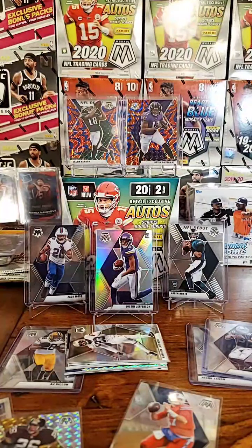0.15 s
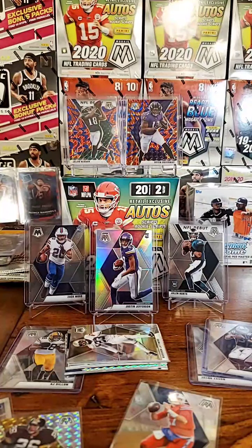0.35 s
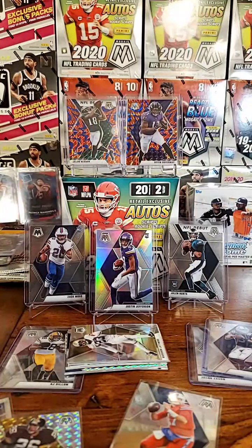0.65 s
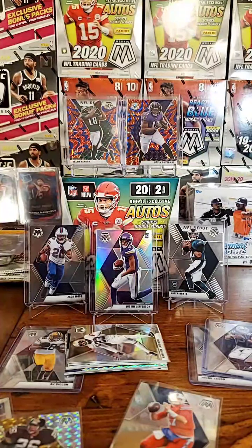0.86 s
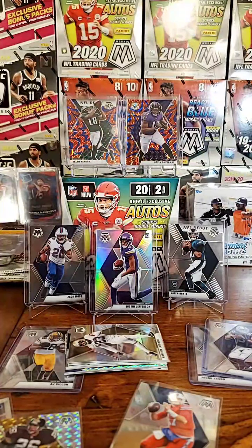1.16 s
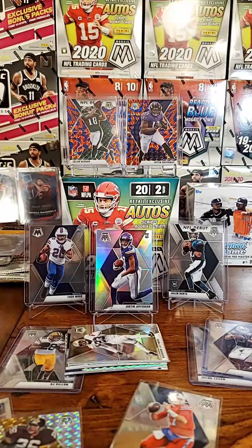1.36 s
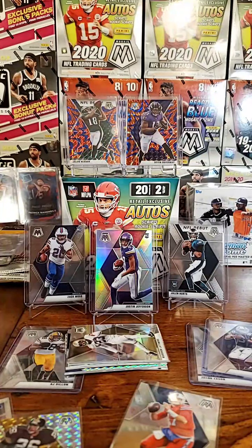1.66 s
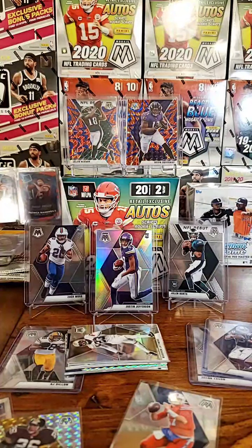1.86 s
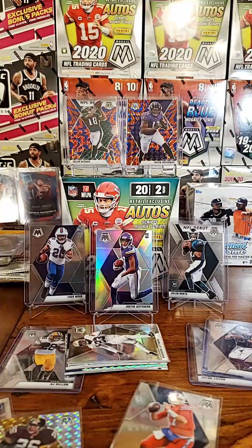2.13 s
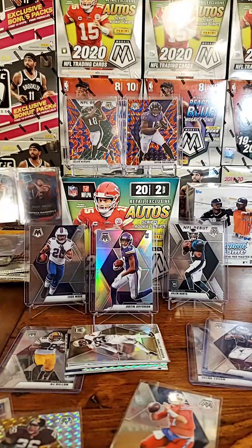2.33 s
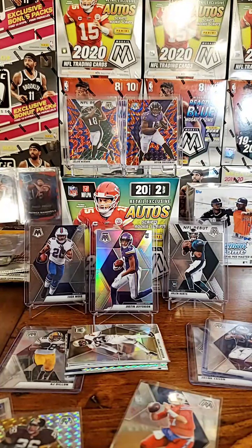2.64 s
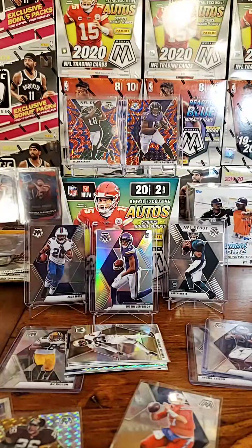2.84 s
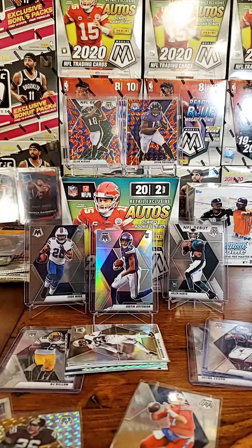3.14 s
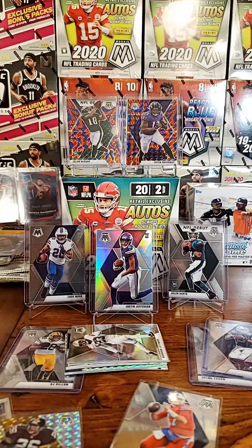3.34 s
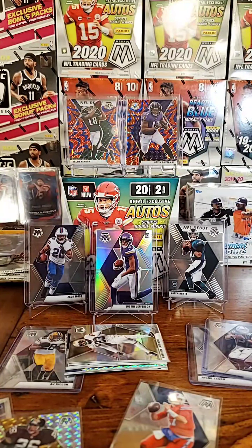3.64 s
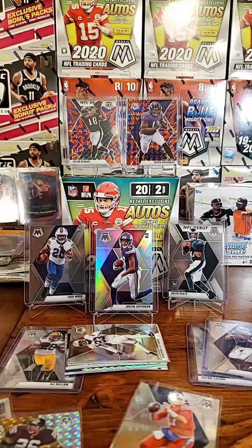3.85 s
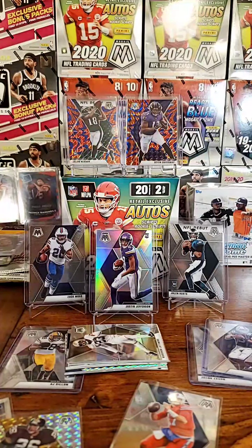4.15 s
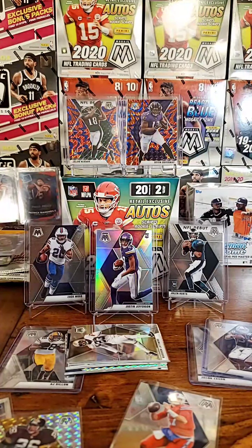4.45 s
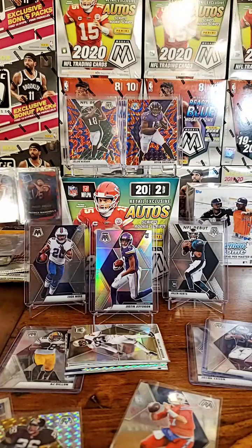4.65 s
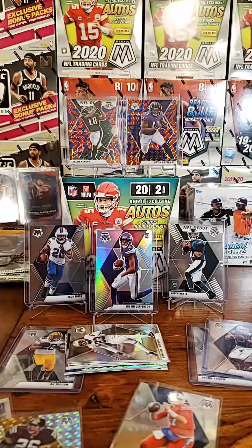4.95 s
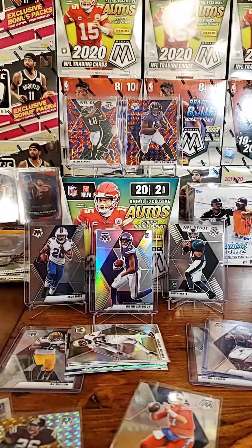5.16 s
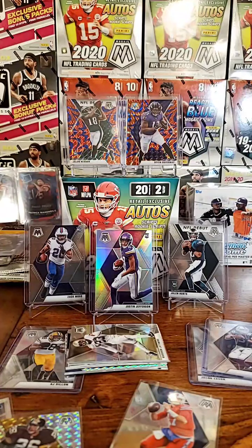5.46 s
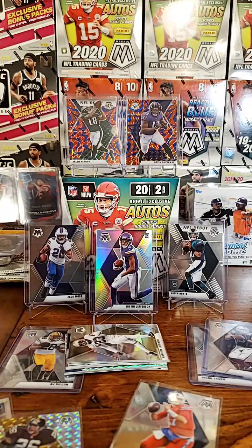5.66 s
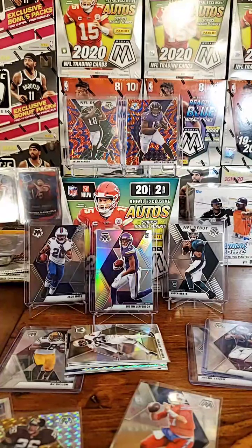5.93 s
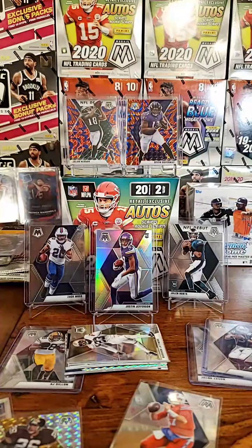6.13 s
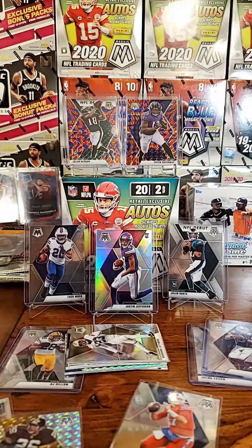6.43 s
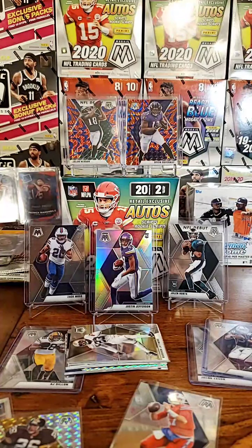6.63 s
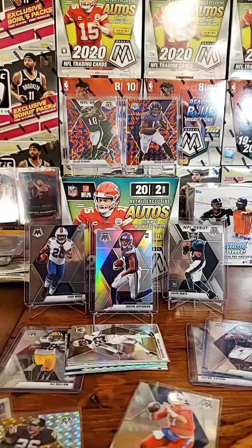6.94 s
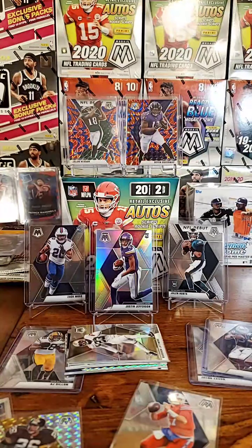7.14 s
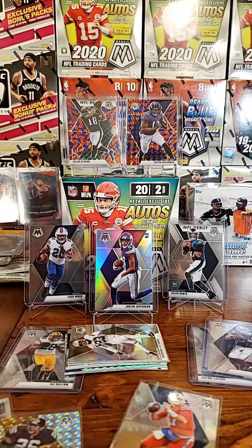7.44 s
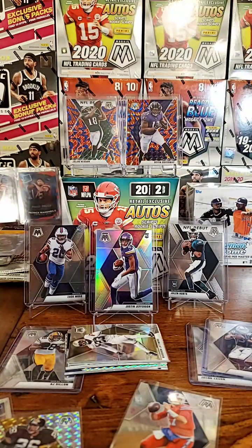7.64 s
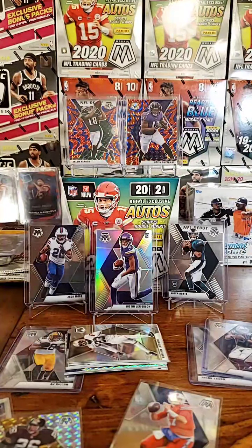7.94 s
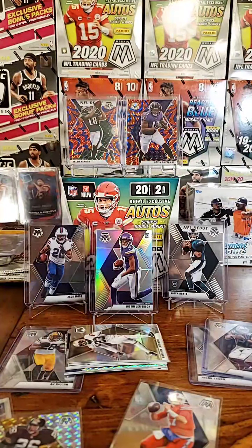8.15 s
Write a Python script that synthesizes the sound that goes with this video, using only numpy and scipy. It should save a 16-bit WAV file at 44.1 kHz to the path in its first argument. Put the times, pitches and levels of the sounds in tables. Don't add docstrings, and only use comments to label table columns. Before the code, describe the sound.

Close up, stiff plastic snaps and thin film crinkles over a low appliance hum, then a hard holder clacks onto a wooden table.

```python
import sys
import numpy as np
from scipy import signal
from scipy.fft import rfft, irfft, next_fast_len
from scipy.io import wavfile
from scipy.ndimage import uniform_filter1d

SR = 44100
rng = np.random.default_rng(int(sys.argv[2]) if len(sys.argv) > 2 else 0)


def ratio_of_db(decibels):
    return 10 ** (np.asarray(decibels, float) / 20)


def master_out(mix):
    frames = np.transpose(np.atleast_2d(mix))
    ceiling = np.clip(frames, -1, 1)
    pcm = np.round(ceiling * 32767).astype(np.int16)
    wavfile.write(sys.argv[1], SR, pcm)


N = 365677


def read(points, hz):
    f, value = np.transpose(points)
    return np.interp(np.log(hz + 1), np.log(f + 1), value)


def evened(x):
    return x / np.sqrt(np.mean(x ** 2) + 1e-20)


def add(mix, s, sound):
    part = mix[round(s * SR):][:len(sound)]
    part += sound[:len(part)]


def band(x, lo_hz, hi_hz, order=3):
    return signal.sosfilt(signal.butter(order, [lo_hz, hi_hz], "bandpass", fs=SR, output="sos"), x)


def shaped(x, gain):
    size = next_fast_len(N)
    return irfft(rfft(x, size) * gain(np.fft.rfftfreq(size, 1 / SR)), size)[..., :N]


def drift(seconds):
    step = max(int(seconds * SR / 8), 1)
    coarse = rng.standard_normal(N // step + 2)
    for _ in range(2):
        coarse = uniform_filter1d(coarse, size=8)
    return np.interp(np.arange(N) / step, np.arange(len(coarse)), evened(coarse))


# (t/s, level/dB)
MOTOR_LOAD = [(0, 5), (.7, -3.5), (1.0, 1.5), (2.2, -1.5), (2.8, 5), (3.1, -3), (3.6, 3), (4.2, -2.5),
              (4.6, 5.5), (5.1, 0.5), (5.8, 15.5), (6.2, -11), (6.4, 8.5), (6.6, 9), (6.7, 1), (6.9, 5.5),
              (7.1, 5), (7.4, 2.5), (7.6, -11), (7.87, 1.5), (8.29, -4.5)]


def motor_load():
    return np.interp(np.arange(N) / SR, *np.transpose(MOTOR_LOAD))


# (f/Hz, spectral level/dB)
AIR = [(15, -56.5), (25, -13.5), (114, -8.5), (170, -10.5), (309, -5.5), (440, -7), (1160, -23.5),
       (2110, -63.5), (2760, -45.5), (4870, -49.5), (6740, -59.5), (14800, -47.5), (16000, -48)]
# (f/Hz, width/Hz, level/dB)
AIR_PEAKS = [(1316, 90, -79.5), (2780, 230, -91), (2760, 70, -87.5), (6750, 660, -88), (749, 12, -77.5),
             (299.2, 31, -70), (444, 22, -68.5), (12765, 3800, -92.5)]


def appliance_air(load_db):
    noise = evened(shaped(rng.standard_normal(N), lambda f: ratio_of_db(read(AIR, f))))
    out = ratio_of_db(-61 + 1.8 * drift(0.064)) * noise
    for hz, width, db in AIR_PEAKS:
        fuzz = band(rng.standard_normal(N), hz - width / 2, hz + width / 2, order=1)
        follows_motor = width < 150 and hz > 2000
        out += ratio_of_db(db + 1.4 * drift(0.31) + load_db * follows_motor) * evened(fuzz)
    return out


# (f/Hz, rms level/dB)
HUM = [(59.2, -70.5), (118.4, -67), (242.2, -70), (306.8, -75), (360.7, -58.5), (452.2, -70.5),
       (500.6, -75), (737.5, -79.5)]
# (f/Hz, rms level/dB)
WHINE = [(2729, -96.5), (6584, -92), (6939, -100), (7058, -99)]


def appliance_tones(load_db):
    t = np.arange(N) / SR
    out = np.zeros(N)
    for hz, db in HUM + WHINE:
        steady = abs(hz - 360) < 8
        sway_db = (0.9 if steady or hz > 2000 else 2.6) * drift(0.12)
        if 2000 < hz < 3500:
            sway_db = sway_db + load_db + 3.9 * drift(0.028)
        wander = (0.15 if steady else 1.1) * drift(0.15 if hz < 2000 else 0.008)
        phase = 2 * np.pi * (hz * t + rng.random()) + wander
        out += np.sqrt(2) * ratio_of_db(db + sway_db) * np.sin(phase)
    return out


def appliance():
    load_db = motor_load()
    return appliance_air(load_db) + appliance_tones(load_db)


# (f/Hz, spectral level/dB)
FILM = [(380, -29.5), (650, 1.5), (873, -8), (1470, -6.5), (2390, -15), (3760, -10.5), (5780, -3),
        (6790, -5), (8410, -8.5), (9880, -3), (15400, 3), (16000, -4)]
# (low f/Hz, high f/Hz)
BANDS = [(7800, 16200), (3100, 7800), (600, 3100)]


def film_slips():
    grain_db = 1.5 * np.minimum(rng.exponential(1, N), 11) + 2.0 * drift(0.0055)
    slips = rng.standard_normal(N) * ratio_of_db(grain_db)
    hz, _, z = signal.stft(slips, SR, nperseg=256)
    patches = rng.standard_normal(z.shape)
    for axis in (0, 0, 1, 1)[::2]:
        patches = uniform_filter1d(patches, size=9, axis=axis)
    colour = ratio_of_db(read(FILM, hz)[:, None] + 2.5 * evened(patches))
    slips = signal.istft(z * colour, SR, nperseg=256)[1][:N]
    return np.array([evened(band(slips, lo, hi)) for lo, hi in BANDS])


# (t/s, pressure level/dB, brightness from speed/dB)
STROKES = [
    [(0.0, -73, -9.5), (.288, -106, 3.5), (.412, -74, -14.5), (.528, -73.5, -17), (.784, -92, -1.5),
     (1.046, -75.5, 2), (1.136, -57, -3.5), (1.3, -62, -2.5)],
    [(1.3, -66, -1.5), (1.408, -70, 3), (1.776, -78.5, 6), (1.888, -77, -1.5), (2.13, -90.5, -1),
     (2.34, -79.5, 0), (2.468, -72, 7), (2.644, -82.5, 8), (2.8, -96, -8)],
    [(4.9, -88.5, 1.5), (5.024, -70, 0), (5.168, -70, 10), (5.354, -55, 0.5), (5.468, -75.5, 17.5),
     (5.66, -60.5, 9), (5.785, -58.5, 8), (5.8, -68, -4), (5.84, -80, -7)],
    [(5.84, -73, 7), (5.91, -76.5, 7.5), (6.046, -74, 11), (6.19, -78.5, 9), (6.4, -82.5, 5.5),
     (6.836, -79.5, -5.5), (6.9, -76, -8.5)],
    [(6.9, -80, -3.5), (7.312, -79.5, 6), (7.514, -82, -8), (7.592, -79, 2), (7.738, -84.5, -1.5),
     (7.9, -84.5, 0)],
]
STROKE_DRAG_DB = [2, -5.5, -11.5, -2.5, 1.5]


def hand_strokes(layers):
    t = np.arange(N) / SR
    level = np.zeros((3, N))
    for rows, drag_db in zip(STROKES, STROKE_DRAG_DB):
        at, press_db, bright_db = np.transpose(rows)
        level += ratio_of_db([np.interp(t, at, press_db + lift_db, left=-200, right=-200)
                      for lift_db in (bright_db, 0, drag_db)])
    return (uniform_filter1d(level, size=600) * layers).sum(0)


# (t/s, length/s, level/dB, f/Hz)
SQUEAKS = [
    (.241, .018, -65, 3450),
    (.255, .016, -58, 3600),
    (5.37, 0.03, -55, 3800),
    (5.0, 0.14, -77, 4900),
    (2.475, .065, -74, 5000),
    (.464, 0.0085, -42, 2500),
]


def squeaks(layers):
    out = np.zeros(N)
    for s, length, db, hz in SQUEAKS:
        grains = layers[1:, round(s * SR):][:, :int(length * SR)].sum(0)
        tone = evened(band(grains, 0.95 * hz, 1.05 * hz, order=2))
        add(out, s, ratio_of_db(db) * np.sqrt(np.hanning(len(grains))) * tone)
    return out


# (t/s, length/s, level/dB,
# brightness/dB, fold f/Hz)
FILM_CATCHES = [(0.245, 0.06, -56, -8, 5470), (0.285, 0.034, -38.5, -1, 3300), (0.259, 0.021, -52, -8, 4400),
                (0.34, 0.025, -50.5, -10, 3080), (0.45, 0.061, -64, -9, 2620),
                (0.743, 0.056, -62.5, -3.5, 4170), (1.195, 0.035, -48.5, -7, 3596),
                (1.247, 0.013, -41.5, -21, 3190), (1.463, 0.036, -68, -17, 5550),
                (1.616, 0.041, -63.5, -10.5, 4700), (1.767, 0.042, -66.5, -2, 5170),
                (1.83, 0.068, -68, -1.5, 5200), (1.905, 0.035, -66.5, -6, 2000), (2.015, 0.11, -78, -6, 5476),
                (2.303, 0.08, -67, 7.5, 4310), (2.503, 0.029, -59, -0.5, 4940), (0.466, 0.02, -52.5, -13, 8000),
                (0.52, .02, -64.5, -13, 3500), (0.457, 0.0061, -77, -20, 2500),
                (3.957, 0.033, -74.5, -3.5, 5000), (1.349, 0.016, -66, 0, 3520),
                (4.976, 0.13, -70.5, 13, 4840), (5.245, 0.054, -66, 15.5, 4930), (5.359, 0.041, -49, 6, 3600),
           (5.417, 0.02, -72, 16, 6000), (5.272, .03, -71, 14, 6000), (5.6, 0.034, -72, 9, 6000),
           (5.409, 0.051, -57, 2, 2850), (5.476, 0.027, -54, 5, 4730), (5.507, 0.11, -59.5, 7.5, 6900),
           (5.65, 0.078, -60, 11, 7390), (5.733, 0.049, -68, 8, 6480), (5.44, 0.0098, -66, -5, 3500),
           (5.871, 0.03, -62, 11.5, 6950), (5.932, 0.056, -63, 9, 7350), (6.747, 0.039, -57, 3, 3445),
           (6.833, 0.016, -56, -2.5, 3660), (6.996, 0.0097, -74, 9, 5512), (7.081, 0.013, -63.5, -8, 6520),
           (7.21, 0.054, -74.5, 11, 6460), (7.358, 0.041, -64, 9.5, 6400), (7.438, 0.033, -63.5, 8.5, 3860),
           (7.477, 0.03, -59.5, 5.5, 4070), (7.638, 0.0066, -61.5, 6, 4830),
           (8.022, 0.36, -78.5, 8.5, 6500), (7.096, 0.17, -80, -10, 1800), (7.251, 0.044, -71, 0.5, 3530),
           (7.3, 0.047, -85, -8, 1700), (7.385, 0.033, -62, -13, 3580), (7.428, 0.054, -79, -6, 1700),
           (7.502, 0.035, -73.5, -4, 3400), (6.85, 0.041, -72.5, -7, 2930)]


def film_catches(layers):
    out = np.zeros(N)
    for s, length, scrape_db, bright_db, fold_hz in FILM_CATCHES:
        drag_db = scrape_db - 7 - np.log2(fold_hz / 3100)
        start = max(s - 0.056 * length, 0)
        fizz, scrape, drag = layers[:, round(start * SR):][:, :int(1.4 * length * SR)]
        fold = evened(band(scrape + drag, fold_hz * 0.888, fold_hz * 1.1, order=1))
        u = np.linspace(0, 1, len(fizz))
        press = np.sin(np.pi / 2 * np.minimum(u / 0.45, 1)) ** 1.25
        release = np.sin(np.pi / 2 * np.minimum((1 - u) / 0.4, 1))
        rub = ratio_of_db(scrape_db + bright_db) * fizz
        rub = rub + ratio_of_db(scrape_db) * (0.5 * scrape + 0.69 * fold) + ratio_of_db(drag_db) * drag
        add(out, start, press * release * rub)
    return out


# (t/s, level/dB, brightness/dB, weight/dB, panel
# f/Hz)
SNAPS = [(.2748, -30, -8, -2, 930), (.2906, -28.5, 10, -4, 5700), (.2929, -22, -5.5, -10, 3820),
         (.2956, -21, 4, -3, 2420), (.2982, -16, -1, -7, 3580), (.3042, -29.5, 11, 3, 3020),
         (.3083, -29, 20.5, -2, 2270), (.3133, -19, -1.5, -1, 2320), (.3164, -17, -1, -7.5, 3550),
         (.3225, -40, 14, 0, 3000), (.3599, -32, -7.5, -10, 5070), (.3657, -42, 11, 4, 4410),
         (.4653, -35.5, 12.5, 7.5, 2620), (.4683, -31, -27, -15, 2450), (.5295, -55, -20, 4, 3450),
         (.7082, -50.5, -3, 3.5, 3020), (.7572, -43.5, 6, -4, 1400), (.7615, -45.5, -3, -1, 5350),
         (0.9966, -5, -2, -15, 4290), (7.326, -62, 12, -10, 6470), (0.998, -28.5, 10, 8, 2000),
        (1.002, -23, 4, -10, 7300), (1.0127, -30, 0, -3, 6540), (1.1677, -32, 11, -8, 1010),
        (1.1679, -40.5, 16, 16, 3640), (1.174, -29, -5, -1, 3420), (1.1939, -25, 2.5, -2.5, 2780),
        (1.1972, -30, -11, -5.5, 3880), (1.2163, -31, 3, -2.5, 2220), (1.219, -30.5, 1, -6, 4400),
        (1.2484, -29, 10.5, 2, 5670), (1.2537, -21, -19, -2.5, 2580), (1.256, -27, 6, 2, 2220),
        (1.2681, -39, -3, 9, 2780), (4.689, -63.5, -7.5, 3, 4900), (5.577, -42.5, -12, 5, 890),
        (7.1657, -61, 11, 10.5, 1770), (5.6573, -27, -6, -15, 6900), (5.9688, -19.5, 7.5, -11, 7360),
        (6.7335, -32.5, 4.5, -8.5, 7000), (3.957, -47, -4.5, -8, 5100), (2.522, -53, -2, -1, 1300)]
# (t/s, level/dB, brightness/dB)
CREASES = [(0.9576, -53, 8), (1.768, -41, -1), (1.7723, -60, 21), (2.2951, -63.5, 15),
           (2.4445, -56.5, 12.5), (2.4690, -63, 9), (2.51, -45, 2), (5.1304, -50, 13), (5.1494, -50, -2.5),
           (5.308, -42, 4.5), (6.884, -64, 14), (5.498, -35.5, 12), (5.6168, -52, 22.5), (5.974, -44, 19),
           (5.9833, -51.5, 14.5), (0.3543, -50, 12), (5.0257, -63, 8), (5.279, -52, 12), (2.3065, -58, -6),
           (2.3214, -56, 14), (5.391, -46, 10), (5.733, -50, 14)]
# (t/s, level/dB, brightness/dB)
TICKS = [(6.4772, -51.5, 9.5), (6.596, -56.5, 11.5), (6.7453, -43.5, 11), (6.7489, -45, 11),
         (6.7583, -40, -4), (6.787, -40.5, -8), (7.0842, -39.5, 11.5), (7.089, -52, 8), (7.1507, -50.5, 8),
         (7.268, -51.5, 11.5), (7.283, -52, 14.5), (7.3914, -39, 9), (7.404, -40, 8), (7.5911, -54.5, 12),
         (7.6166, -33.5, -2), (7.6391, -27.5, 1), (7.6441, -25.5, 3), (7.699, -46, 3.5)]
PANEL = (1, 1.72, 2.27)


def crackle():
    t, out = np.arange(500) / SR, np.zeros((2, N))
    clicks = SNAPS
    clicks = clicks + [(*row, -12.5, 4930) for row in CREASES]
    clicks = clicks + [(*row, -9, 0) for row in TICKS]
    step = 1. * (np.arange(500) == 4)
    for s, crack_db, bright_db, body_db, hz in clicks:
        spit = rng.standard_normal(500)
        rattle = 0.06 * spit * np.exp(-t / 0.0025)
        lifts_db, fades_ms, walls_db = (bright_db, 0, body_db), (0.4, 0.55, 0.9), (-3.5, -1.5, 1.5)
        for lift_db, (lo, hi), fade_ms, wall_db in zip(lifts_db, BANDS, fades_ms, walls_db):
            db = crack_db + lift_db
            fade = np.exp(-1000 * t / fade_ms)
            rings = [hz * k for k in PANEL if max(lo, 1000) < hz * k < min(hi, 10500)]
            ring = 0.8 * sum((hz / f) ** 0.77 * np.sin(2 * np.pi * f * t) for f in rings)
            burst = band(0.74 * step + (0.6 * spit + ring) * fade + rattle, lo, hi, order=2)
            add(out[0], s, ratio_of_db(db) * burst / abs(burst).max())
            spread = band(step + 0.16 * ring * fade, lo, hi, order=1)
            add(out[1], s, ratio_of_db(db + wall_db) * spread / abs(spread).max())
    return out


# (t/s, peak level/dB,
# f/Hz, t60/s)
THUMPS = [(.276, -33, 66, 0.089), (0.301, -19, 101.4, 0.027), (0.323, -36, 53.7, 0.31),
          (.29, -33.5, 315, 0.049), (0.9959, -16, 300, 0.01), (1.01, -40, 99.7, 0.17),
          (1.031, -45.5, 51.8, 0.26), (1.25, -40, 94, 0.085), (1.774, -44.5, 88, 0.15),
          (1.77, -44, 222, 0.053), (3.957, -50, 880, 0.032), (4.689, -47, 780, .04),
          (5.419, -45, 440, 0.07), (5.53, -45, 450, 0.06), (5.575, -39, 640, 0.02),
          (6.779, -49.5, 80, 0.32), (7.616, -29.5, 105, 0.078), (7.648, -24, 75.4, 0.0314),
          (7.933, -31, 203, 0.17), (7.94, -18, 560, 0.065), (7.934, -30, 1700, 0.079),
          (7.954, -33, 97, 0.35), (7.96, -32, 52.1, 0.47), (7.971, -45, 124.5, 0.18),
          (7.955, -24, 741, .17), (7.955, -22, 1335, .2), (7.955, -32, 1640, .17), (7.955, -36.5, 690, .2),
          (7.955, -40, 3360, .2)]


def table():
    t, out = np.arange(20000) / SR, np.zeros(N)
    onset = 1 - np.exp(-t / 0.0034)
    for s, db, hz, t60 in THUMPS:
        add(out, s, -ratio_of_db(db - 60 * t / t60) * np.sin(2 * np.pi * hz * t) * onset)
    return band(out, 32, 9000, order=2)


# (t/s, length/s, level/dB, start f/Hz, end f/Hz)
WHISTLE = (5.103, .024, -50, 14000, 11000)


def whistle():
    out = np.zeros(N)
    s, length, db, from_hz, to_hz = WHISTLE
    glide_hz = np.linspace(from_hz, to_hz, int(length * SR))
    tone = np.sin(2 * np.pi * np.cumsum(glide_hz) / SR)
    add(out, s, ratio_of_db(db) * np.hanning(len(glide_hz)) * tone)
    return out


# (t/s, blow level/dB, tick level/dB, contact/ms, pitch factor)
KNOCKS = [
    (7.9324, -3.5, -8.5, 0.376, 0.51),
    (7.954, -2, -10, 0.321, 1.01),
    (7.9648, -15.5, -26, 0.537, 1),
    (7.9384, -17.5, -29.5, .35, 0.86),
    (7.957, -11, -28, 0.12, 2.3),
    (7.968, -15, -24.5, 0.227, 1.2),
]
# (f/Hz, level/dB, t60/s)
HOLDER = [(511, -12, 0.013), (808, -19.5, 0.028), (1084, -3.5, 0.0198), (1338, 0, 0.028), (1570, -4, 0.013),
          (2010, -13.5, 0.063), (2630, -9.5, 0.025), (3400, -0.5, 0.011), (3850, -6.5, 0.013),
          (4420, -13, 0.016)]


def holder():
    t, out = np.arange(6000) / SR, np.zeros((2, N))
    short = t[:600]
    impulse = 1. * (short == 0)
    for s, blow_db, tick_db, contact_ms, pitch in KNOCKS:
        force = np.hanning(int(contact_ms * SR / 1000) + 3)
        spits = (0.5 * rng.standard_normal(600) + 1.3 * impulse, 2.5 * impulse)
        for path, blur, edge_db, spit in zip(out, (1, 3.5), (0, -4), spits):
            modes = sum(ratio_of_db(db - 60 * blur * t / t60) * np.cos(2 * np.pi * hz * pitch * t)
                        for hz, db, t60 in HOLDER)
            body = signal.fftconvolve(modes, force)
            tick = band(spit * np.exp(-short / 0.00095), 2500, 13000, order=1)
            add(path, s, -ratio_of_db(blow_db) * body / abs(body).max())
            add(path, s, ratio_of_db(tick_db + edge_db) * tick / abs(tick).max())
    return out


# (f/Hz, t60/s)
ROOM = [(100, 0.32), (500, 0.32), (1500, 0.33), (4000, 0.33), (6500, .27), (9000, .26), (15000, 0.39)]
# (f/Hz, level/dB)
WALLS = [(500, 0.5), (2000, -1.5), (3800, 1), (5300, -4), (6800, 0.5), (8300, -2.5), (10000, 0.5),
         (15000, -1)]
# (t/s, level/dB)
ECHOES = [
    (.005, -20.5),
    (0.0146, -18),
]


def room(x):
    taps = rng.choice([-1., 1.], SR // 2) * (np.arange(SR // 2) > 70)
    hz, t, z = signal.stft(taps, SR, nperseg=256)
    early = 1 + 2.4 * np.exp(-t / 0.004996)
    even = z / np.sqrt(abs(z) + 1e-9)
    decay_db = read(WALLS, hz)[:, None] - 60 * t / read(ROOM, hz)[:, None]
    tail = signal.istft(even * early * ratio_of_db(decay_db), SR, nperseg=256)[1]
    tail = tail / np.linalg.norm(tail)
    for s, db in ECHOES:
        add(tail, s, ratio_of_db(db) * np.hanning(5))
    return signal.fftconvolve(x, tail)[:N]


def scene():
    layers = film_slips()
    rubs = hand_strokes(layers) + squeaks(layers) + film_catches(layers) + whistle()
    snaps, snaps_to_walls = crackle()
    knocks, knocks_to_walls = holder()
    mix = appliance() + rubs + snaps + table() + knocks
    mix += room(ratio_of_db(-7.5) * snaps_to_walls + ratio_of_db(0.7) * knocks_to_walls + ratio_of_db(-9.5) * rubs)
    return np.array([mix, mix])


def roll_off(x):
    return signal.sosfilt(signal.butter(12, 16840, fs=SR, output="sos"), x)


# (f/Hz, left-right level/dB)
PORTS = [(5500, 0), (6300, -3), (7300, -9), (8200, 9), (9300, 4), (10400, 1.5), (11200, 1.5)]
# (f/Hz, level/dB)
MIC = [(7000, 1), (8500, -0.5), (11300, 2.5), (13500, -1.5), (15500, -2.5), (15800, -31), (16500, -35.5),
       (16750, -91)]


def record(dry):
    sides = np.array([[1], [-1]])

    def response(f):
        tilt = np.tanh(read(PORTS, f) * np.log(10) / 20)
        return np.sqrt(1 + tilt * sides) * ratio_of_db(read(MIC, f))

    def self_noise(f):
        hiss = ratio_of_db(-87.0) * (f > 5400) * (f < 15600)
        rumble = ratio_of_db(-61.0) * (f > 35) / (1 + (f / 140) ** 3)
        return hiss + rumble

    noise = shaped(rng.standard_normal(N) * sides, self_noise)
    finished = shaped(np.clip(dry, -0.82, 0.82), response) + noise
    return roll_off(finished)


dry = scene()
out = record(dry)
master_out(out)
```